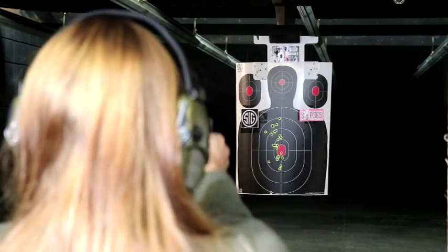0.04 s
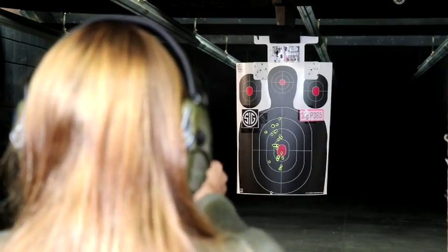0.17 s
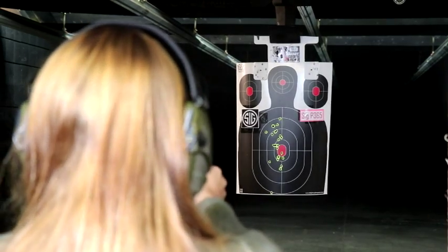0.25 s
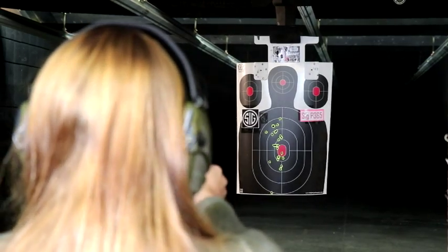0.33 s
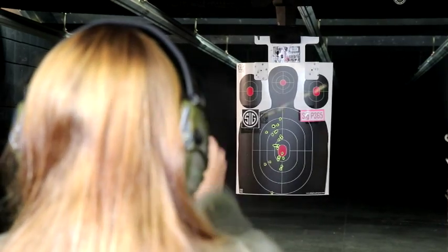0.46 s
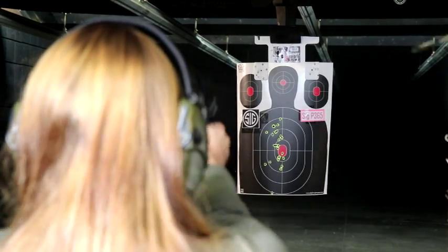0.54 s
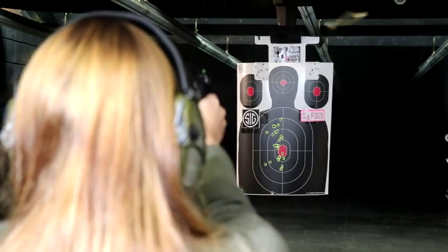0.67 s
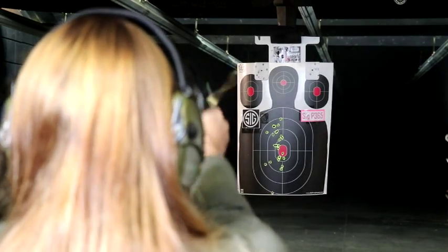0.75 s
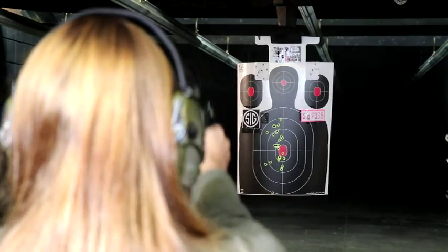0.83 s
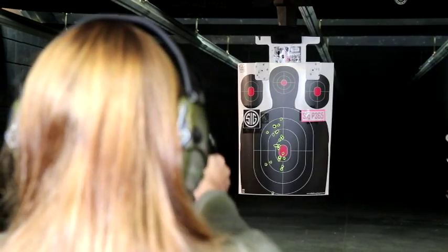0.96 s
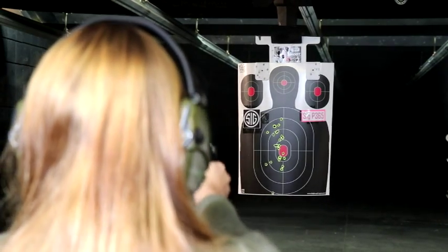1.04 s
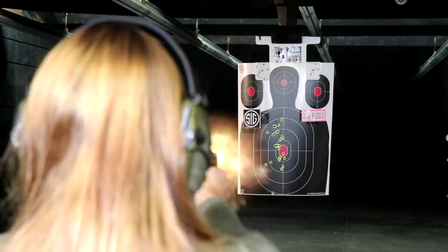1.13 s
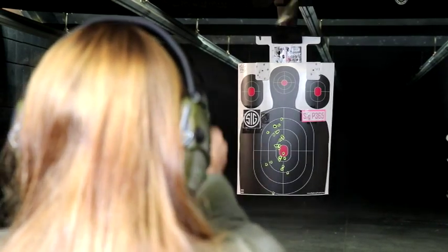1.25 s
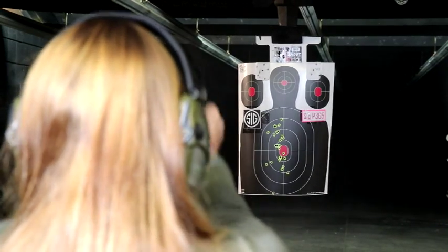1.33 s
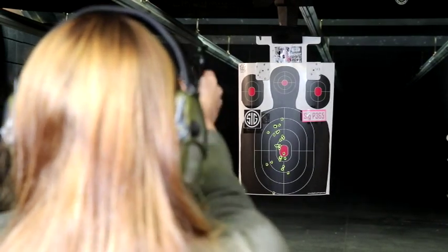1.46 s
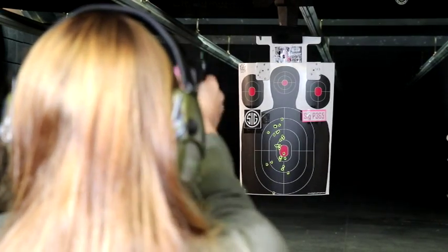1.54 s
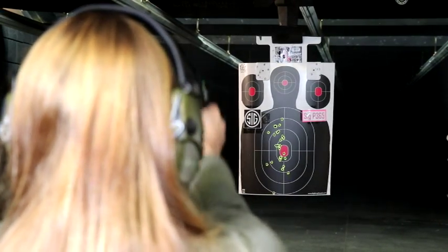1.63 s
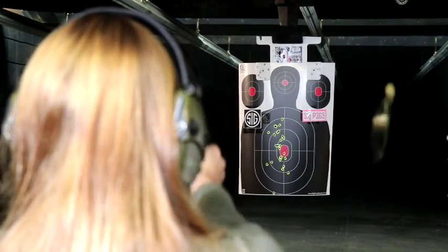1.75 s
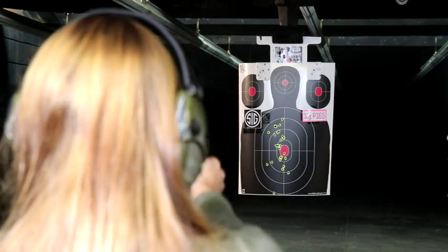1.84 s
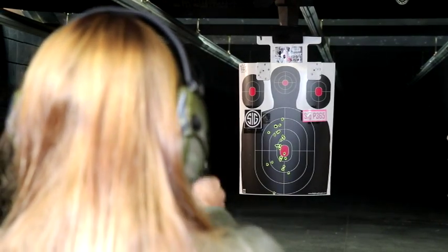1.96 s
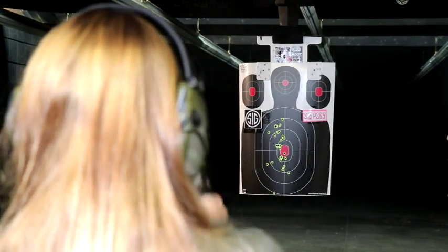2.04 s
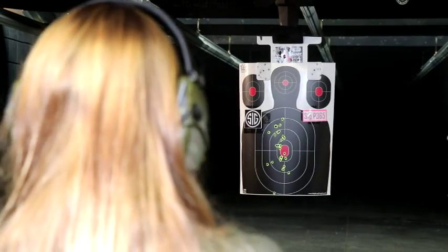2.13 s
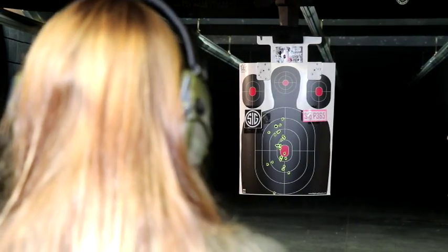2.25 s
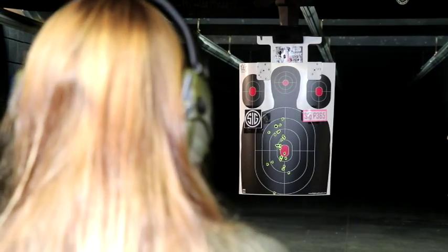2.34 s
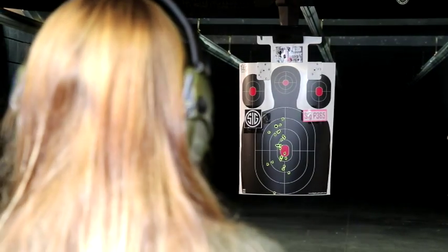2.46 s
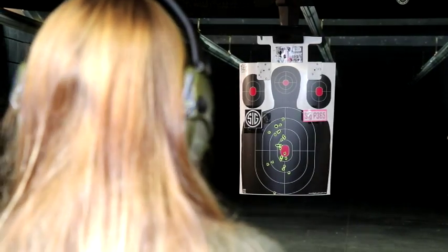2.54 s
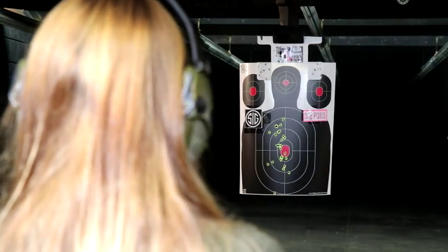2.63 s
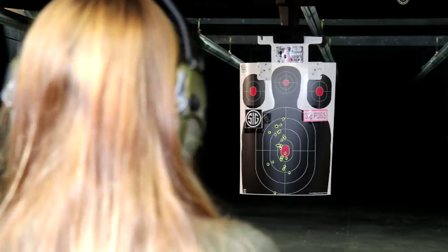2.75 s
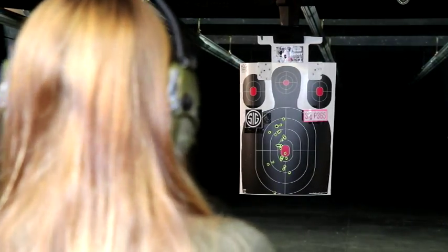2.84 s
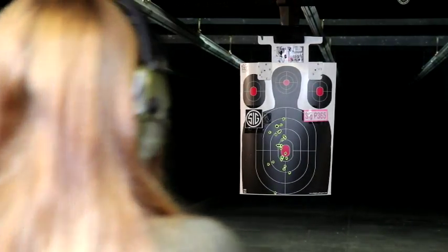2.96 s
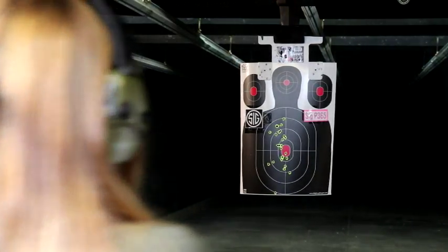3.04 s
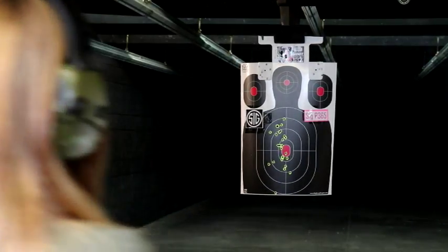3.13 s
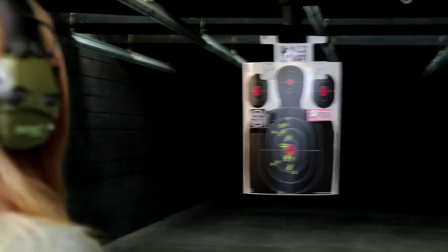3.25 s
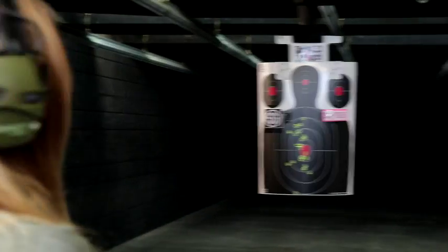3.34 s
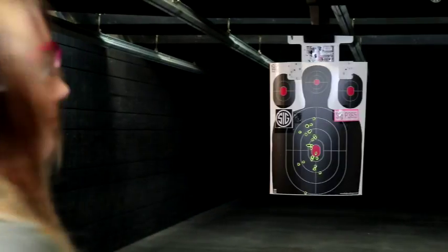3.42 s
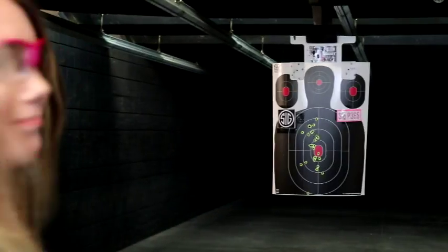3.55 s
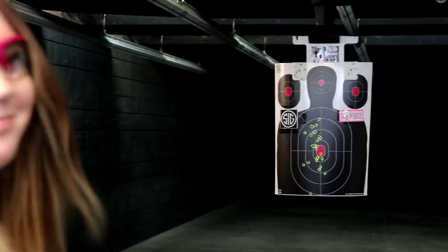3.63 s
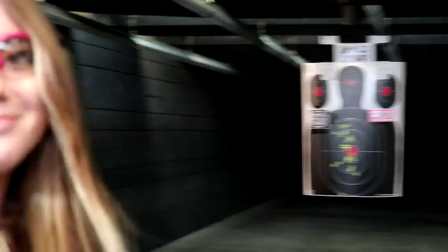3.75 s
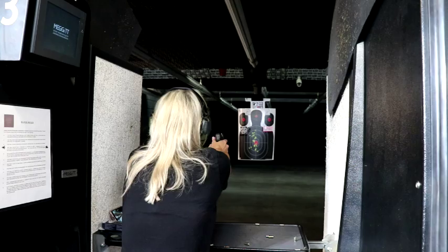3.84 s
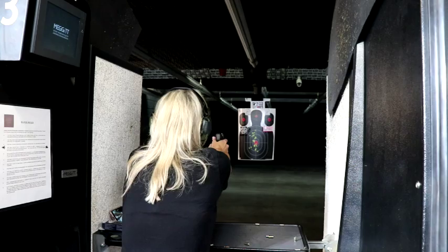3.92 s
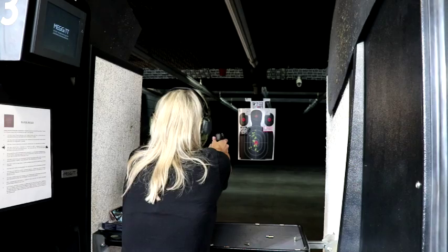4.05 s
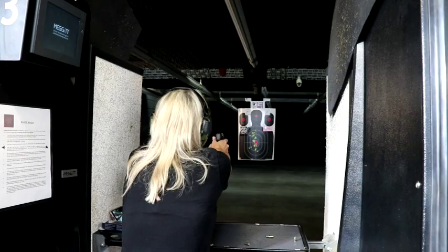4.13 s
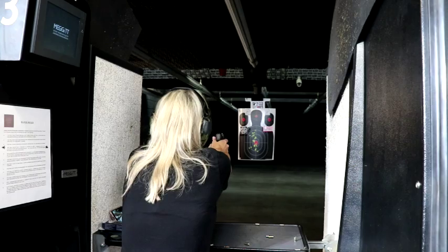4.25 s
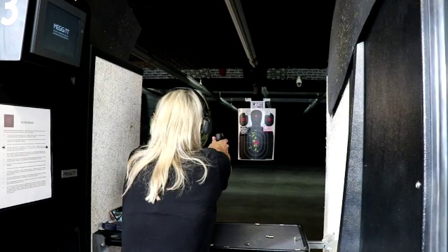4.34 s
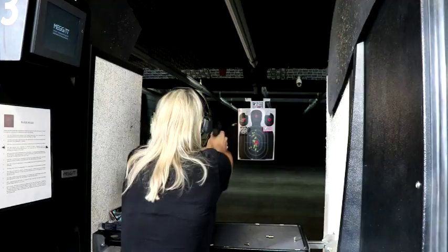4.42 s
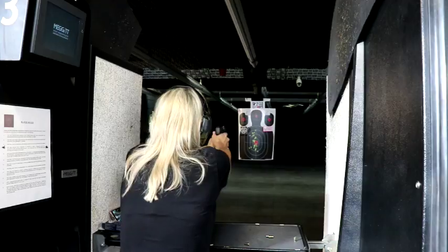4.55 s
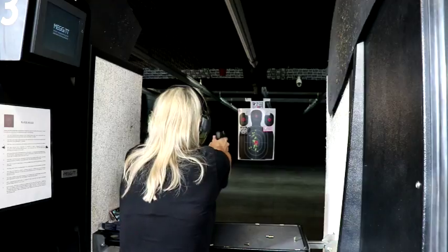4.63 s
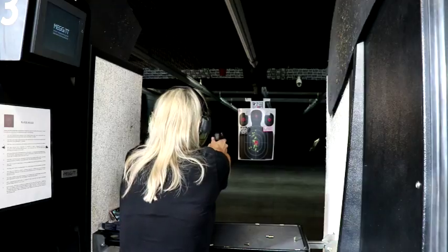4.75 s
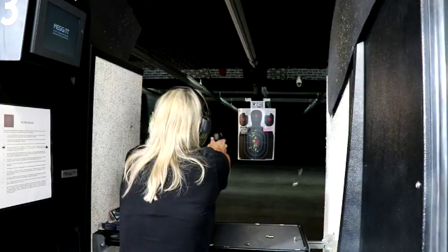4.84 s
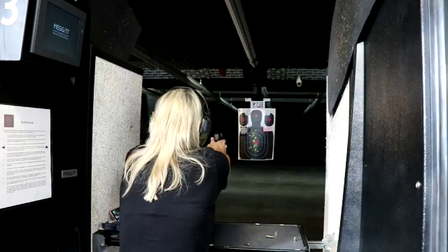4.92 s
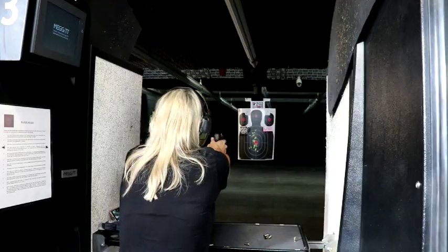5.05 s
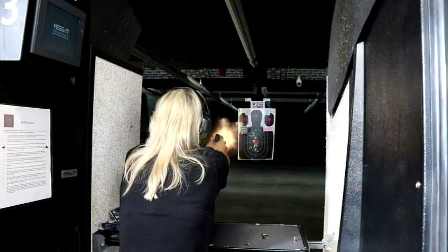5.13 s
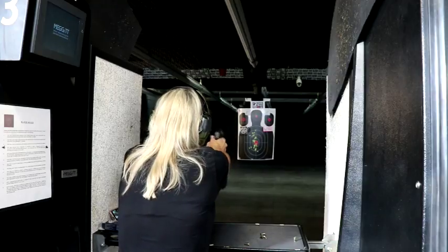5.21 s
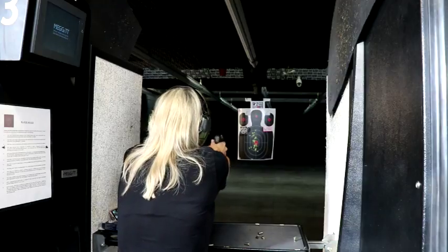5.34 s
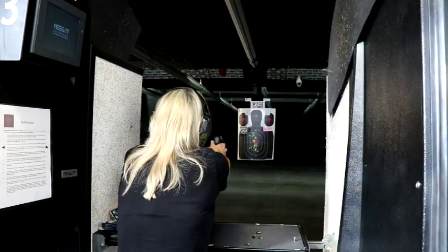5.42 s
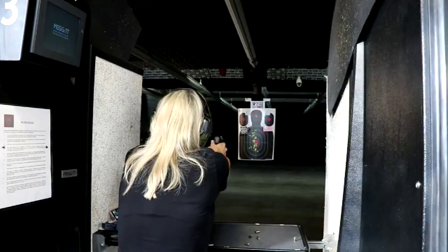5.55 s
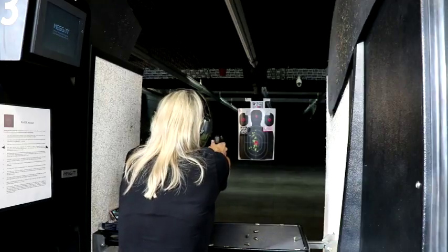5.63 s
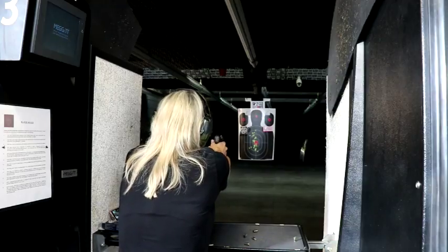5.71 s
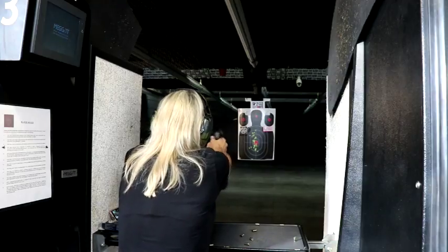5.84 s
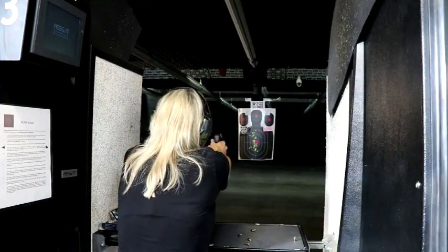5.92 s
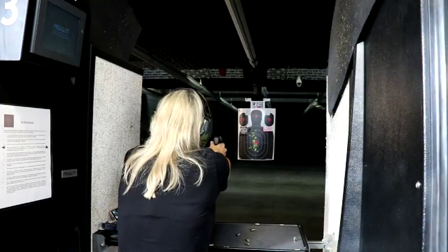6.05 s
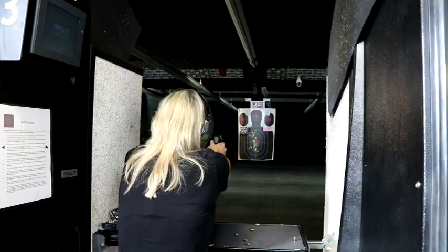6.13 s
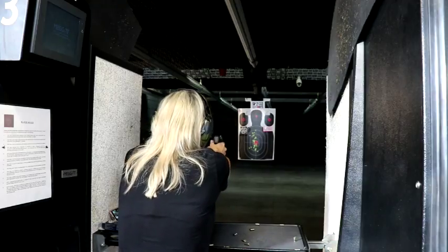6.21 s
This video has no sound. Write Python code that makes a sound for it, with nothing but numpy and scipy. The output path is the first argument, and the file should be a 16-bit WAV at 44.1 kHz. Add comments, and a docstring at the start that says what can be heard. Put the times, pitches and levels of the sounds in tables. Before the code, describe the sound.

A phone close behind a shooter catches distorted pistol shots with sharp slaps and dense roaring echoes. Brass cases tick and ring after them. Midway, small steel clicks and woody bench thuds with faint rattling fill a lull over rumbling air. Then three still louder, bassier shots are heard from behind the booth, the last one still echoing at the end.

```python
"""Loud pistol shots in an indoor range, heard first over the shooter's shoulder, then from behind the booth.
Each shot is a pressure jolt, a bright slap and a roar of shaped noise that fills the concrete lanes.
Spent cases land and ring, and the gun is handled and put down on the bench: noisy cracks that ring
the objects' own tones. Ventilation noise and hum lie beneath, and the blasts overload a phone microphone."""
import sys
import numpy as np
from scipy import signal
from scipy.fft import rfft, irfft, next_fast_len
from scipy.io import wavfile
from scipy.ndimage import uniform_filter1d

SR = 44100
rng = np.random.default_rng(int(sys.argv[2]) if len(sys.argv) > 2 else 0)


def master(y):
    """Save y as 16-bit WAV."""
    cut = np.clip(np.atleast_2d(y).T, -1, 1)
    pcm = np.round(cut * 32767)  # scale
    wavfile.write(sys.argv[1], SR, pcm.astype(np.int16))


N = 276992  # length of the scene in samples
BANDS = 28 * 2 ** np.arange(0, 9.2, 1 / 2)  # centres of the half-octave bands, Hz

# Gun and hands meeting the bench: [start t/s, crack level/dB, centre of the crack f/Hz, time to fall 60 dB t/s]
BENCH_KNOCKS = [(2.535, -30.5, 1680, .078), (2.894, -42, 248, 0.075), (2.91, -42.5, 235, 0.17),
                (3.15, -54, 430, .12), (3.183, -42, 300, 0.18), (3.195, -25, 392, 0.15),
                (3.221, -28.5, 291, .14), (3.271, -37.5, 320, 0.27), (3.568, -36.5, 241, .13),
                (3.588, -36, 328, 0.16), (3.604, -35.5, 221, 0.054)]


def undb(db):
    """Turn decibels into a gain: 20 dB is ten times the amplitude."""
    return 10 ** (np.asarray(db) / 20)


def unit(x):
    """Scale a sound to rms 1."""
    return x / np.sqrt(np.mean(x ** 2))


def read(table, hz, column):
    """Read a table column between its rows, on a log-frequency axis."""
    table = np.array(table, float)
    return np.interp(np.log(hz), np.log(table[:, 0]), table[:, column])


def split(size):
    """Cut white noise into overlapping half-octave bands, so each can be shaped alone."""
    f = np.maximum(np.arange(size // 2 + 1) * SR / size, 1)
    share = np.clip(1 - np.abs(2 * np.log2(f / BANDS[:, None])), 0, 1)
    return irfft(rfft(rng.standard_normal(size)) * share, size)


def band(low_hz, high_hz, size):
    """Make noise between two frequencies, at rms 1."""
    edges = [low_hz, min(high_hz, 15000)]
    sos = signal.butter(2, edges, "band", fs=SR, output="sos")
    return unit(signal.sosfilt(sos, rng.standard_normal(size)))


def add(out, x, s):
    """Mix x into out from time s; whatever falls outside the scene is left out."""
    i = int(round(s * SR))
    piece = x[max(-i, 0):N - i]
    out[max(i, 0):max(i, 0) + len(piece)] += piece


def echo(colour_db, stretch, hold_s, size):
    """Dense reflections: every band fills in a few cycles, holds, dies at its own rate, and a faint far end lingers."""
    # How the hall dies away: [f/Hz, time to fall 60 dB before the stretch t/s, starting level of the far end/dB]
    hall = [(40.3, 0.97, -39.5), (120.4, 0.63, -39.5), (342, 0.34, -32.5), (700, 0.55, -37.5),
            (1390, 0.42, -37.5), (3240, 0.4, -53.5), (6230, 0.31, -63), (10000, 0.11, -62.5)]
    far_t60_s, build_cycles = 1.25, 7.86
    t, hz = np.arange(size) / SR, BANDS[:, None]
    late = np.sqrt(t ** 2 + hold_s ** 2) - hold_s  # starts slowly, so the level holds at first
    near = undb(-60 * late / (stretch * read(hall, hz, column=1)))
    far = undb(read(hall, hz, column=2) - 60 * t / far_t60_s)
    fill = 1 - np.exp(-t * hz / build_cycles)
    bands = undb(colour_db)[:, None] * split(size) * fill * (near + far)
    return np.sum(bands, axis=0)


def taps(events, modes, octaves, best_db, best_hz, loss_db):
    """Each blow is a noisy crack that also drives the object's own tones, a little differently every time.

    octaves: width of the crack; best_db: strongest ring, for a crack centred at best_hz;
    loss_db: ring lost per octave away from best_hz.
    """
    out, t = np.zeros(N), np.arange(SR // 2) / SR
    hz, mode_db, t60 = np.transpose(modes)[:, :, None]
    for s, db, centre_hz, decay in events:
        fade = undb(-60 * t / max(decay, .003))
        luck = rng.standard_normal((2, len(hz), 1))  # level and pitch of each tone vary from blow to blow
        tone_gain = undb(mode_db + 3 * luck[0] - 60 * t / t60)
        tones = np.sin(2 * np.pi * hz * (1 + .01 * luck[1]) * t)
        body = np.sum(tone_gain * tones, axis=0)
        ring = signal.fftconvolve(body, fade * rng.standard_normal(len(t)))[:len(t)]
        ring = ring / np.sqrt(np.sum(fade ** 2))  # a long crack does not ring louder for its length
        ring_db = best_db - loss_db * abs(np.log2(centre_hz / best_hz))
        half_width = 2 ** (octaves / 2)
        crack = band(centre_hz / half_width, centre_hz * half_width, len(t))
        add(out, undb(db) * (fade * crack + undb(ring_db) * ring), s)
    return out


def ventilation():
    """Air rush: noise bands that swell together and flicker alone, with steady mains hum."""
    # Colour of the air rush: [f/Hz, relative level per Hz/dB]
    air_colour = [(15, -49), (25, -13), (65, -3.5), (102, -13), (276, -13), (346, -16), (445, -22.5),
                  (698, -17), (791, -23.5), (1810, -26.5), (9910, -31), (12900, -59.5), (21800, -120)]
    # Mains hum: [f/Hz, rms level/dB]
    hum_tones = [(60, -64.5), (120, -68.5)]
    air_db, flicker_db = -58, 1.5
    k = SR // 12  # samples between random steps
    steps = rng.standard_normal((len(BANDS) + 1, N // k + 1))
    walk = uniform_filter1d(np.repeat(steps, k, axis=1), k, axis=1)[:, :N]
    # the rumble surges, the hiss hardly
    swell_db = np.clip(4.0 - 0.48 * np.log2(BANDS[:, None] / 60), 0, None)
    colour_db = read(air_colour, BANDS, column=1)[:, None]
    gain_db = colour_db + swell_db * walk[0] + flicker_db * walk[1:]
    bands = split(next_fast_len(N))[:, :N] * undb(gain_db)
    t = np.arange(N) / SR
    hum = sum(np.sqrt(2) * undb(db) * np.sin(2 * np.pi * hz * t) for hz, db in hum_tones)
    return undb(air_db) * unit(bands.sum(axis=0)) + hum


def rustle():
    """Cloth and hands: faint scattered ticks of noise, mostly soft with a few louder ones."""
    ticks_per_s, softest_db, t60_s = 4.7, -65.5, .03
    chance = rng.random((int(ticks_per_s * N / SR), 3))
    out, t = np.zeros(N), np.arange(SR // 20) / SR
    for when, size, pitch in chance:
        top_hz = 300 * 2 ** (3.0 * pitch)
        gain = undb(softest_db - 4.3 * np.log(size) - 60 * t / t60_s)
        add(out, gain * band(top_hz / 2, top_hz, len(t)), when * N / SR)
    return out


def rattle():
    """Loose parts shaken by every knock: a hiss that jumps in level every few ms and dies slower than the knock."""
    rattle_db, growth = -51, 0.53  # level under a -36.5 dB knock; dB gained per dB of knock
    out, t = np.zeros(N), np.arange(SR // 2) / SR
    for s, db, _, decay in BENCH_KNOCKS:
        jumps_db = 3.8 * np.repeat(rng.standard_normal(len(t) // 150 + 1), 150)[:len(t)]
        start_db = rattle_db + growth * (db + 36.5)
        gain = undb(start_db + jumps_db - 60 * t / (2 * decay))
        add(out, gain * band(1290, 5340, len(t)), s)
    return out


def bench_knocks():
    """Gun and hands meet the bench: dull cracks that ring its low tones."""
    # Tones of the bench: [f/Hz, typical level/dB, time to fall 60 dB t/s]
    bench_tones = [(106.5, -9, 0.17), (170, -7, 0.062), (252.5, 7, 0.05), (314, 12, 0.045),
                   (544, -5.5, 0.17), (630, -7, 0.045), (880, -26, 0.037)]
    return taps(BENCH_KNOCKS, bench_tones, octaves=2, best_db=0, best_hz=400, loss_db=8)


def gun_catches():
    """Catches and springs of the gun: small wide cracks that ring the steel."""
    # Clicks: [start t/s, crack level/dB, centre of the crack f/Hz, time to fall 60 dB t/s]
    clicks = [(2.523, -40.5, 4920, .018), (2.529, -48, 5200, 0.016), (2.816, -46, 4860, 0.044),
              (2.958, -46.5, 7520, 0.025), (3.083, -48.5, 5300, .015), (3.123, -49, 2900, 0.012),
              (3.156, -48, 2300, 0.022), (4.439, -45, 1603, .015), (4.447, -42.5, 1246, 0.038)]
    # Tones of the steel: [f/Hz, typical level/dB, time to fall 60 dB t/s]
    steel_tones = [(3580, -6, 0.048), (4800, -18, .03), (5120, 12, 0.022), (5500, -6, 0.064),
                   (5440, -11, .06), (5440, -8.5, 0.054)]
    return taps(clicks, steel_tones, octaves=3, best_db=5.6, best_hz=4300, loss_db=27.4)


def spent_cases():
    """Spent cases land: each crack rings the brass most when its pitch is near the brass tones."""
    # Landings: [start t/s, crack level/dB, centre of the crack f/Hz, time to fall 60 dB t/s]
    landings = [(.362, -33, 4900, 0.2), (.368, -36, 770, 0.39), (.480, -28, 702, 0.018),
                (1.162, -50.5, 4430, 0.057), (1.259, -36.5, 1500, .05), (1.270, -35.5, 608, 0.043),
                (4.817, -14.5, 2990, 0.038), (5.127, -21, 2000, .016), (5.130, -16, 1500, .016),
                (5.134, -21.5, 550, 0.031)]
    # Tones of the brass: [f/Hz, typical level/dB, time to fall 60 dB t/s]
    brass_tones = [(3300, -4, .03), (3900, -0.5, 0.065), (4430, -2, .05), (4900, -1.5, 0.16),
                   (5530, -2, .04), (6400, -7, .1), (8600, -14, .05), (9580, -16.5, 0.065)]
    return taps(landings, brass_tones, octaves=1.45, best_db=-6, best_hz=4898, loss_db=29)


def booth_echo(small):
    """The booth answers the small sounds with short, dense reflections, weaker in the bass."""
    colour_db = 1.6 * np.log2(np.minimum(BANDS / 400, 1))
    booth = echo(colour_db, stretch=.55, hold_s=0.00078, size=2 ** 15)
    booth /= np.sqrt(np.sum(booth ** 2))
    return undb(-17.5) * signal.fftconvolve(small, booth)[:N]


def ringing(x):
    """The lanes favour a few narrow resonances, added to the passing sound."""
    # Resonances of the lanes: [f/Hz, level against the passing sound/dB]
    lane_peaks = [(382, -8), (474, -7.5), (545, -7), (597, -5), (700, -5.5), (1007, -8.5)]
    width_hz = 17
    return x + sum(undb(db) * signal.lfilter(*signal.iirpeak(hz, hz / width_hz, fs=SR), x)
                   for hz, db in lane_peaks)


def shots():
    """A shot is an N-shaped muzzle blast, a bright slap off the booth partitions, then the roar of the lanes."""
    # Shots: [start t/s, roar level over the microphone's limit/dB, place: 0 over the shoulder, 1 behind the booth]
    firing = [(-0.21, 13.54, 0), (0.6129, 15.2, 0), (1.350, 14.73, 0), (4.574, 18.4, 1), (5.316, 17.53, 1),
              (5.951, 17.5, 1)]
    # Listening places: [brightness/dB per octave, decay stretch/factor, extra bass/dB]
    listening = [(5.5, 1.006, 9), (4.5, 1.012, 10.5)]
    # What the lanes return of a blast, before the place colours it: [f/Hz, relative level per Hz/dB]
    lane_colour = [(18, -56), (30, -26.5), (70, -19.5), (132, -13), (176, -25), (209, -13), (324, -1),
                   (444, 0.5), (703, -5), (757, -6.5), (1040, -11), (2430, -29), (9910, -58.5),
                   (12900, -100), (21800, -120)]
    bass_hz, blast_s = 270.4, 0.00043
    hold_s = 0.027  # returns from along the lanes keep arriving before the decay sets in
    slap_db, slap_t60_s = -6.5, 0.044
    out = np.zeros(N)
    for s, db, place in firing:
        tilt_db, stretch, bass_db = listening[round(place)]
        colour_db = read(lane_colour, BANDS, column=1) + tilt_db * np.log2(BANDS / 600)
        colour_db = colour_db + bass_db / (1 + (BANDS / bass_hz) ** 4)
        roar = ringing(echo(colour_db, stretch, hold_s, size=2 ** 16))
        roar /= np.sqrt(np.mean(roar[:SR // 20] ** 2))  # rms 1 over the first 50 ms
        t = np.arange(len(roar)) / SR
        slap = band(1507, 7300, len(roar)) * undb(slap_db - 60 * t / slap_t60_s)
        blast = np.linspace(1, -1, int(blast_s * SR))  # pressure jumps up, falls below zero, jumps back
        add(out, undb(db) * (roar + slap), s)
        add(out, undb(db - 2.0) * blast, s)
    return out


def scene():
    """Mix the air, the small sounds with the echo of the booth, and the shots."""
    small = rustle() + rattle() + bench_knocks() + gun_catches() + spent_cases()
    return (ventilation() + small + booth_echo(small) + shots())[None]


def saturate(x):
    """The capsule is straight for small pressures, then a rounded corner, then flat."""
    knee = 5.0  # higher is a sharper corner
    return x / (1 + np.abs(x) ** knee) ** (1 / knee)


def duck(dry):
    """Gain control: a share of the briefly averaged level above the limit comes off and returns as the roar fades."""
    share, average_s = .13, .03
    power = uniform_filter1d(dry ** 2, int(average_s * SR), axis=1)
    power_db = 10 * np.log10(power.clip(1e-12))
    return undb(-share * np.maximum(power_db, 0))


def record(dry):
    """The phone flattens and ducks loud sound, thins the bass, lifts the low mids, cuts the treble and clips."""
    skew = 0.47  # off-centre, so pushes and pulls flatten unequally
    x = (saturate(dry + skew) - saturate(skew)) * duck(dry)
    low_hz, low_q, out_db = 38, 0.9, -2.5
    w = 2 * np.pi * low_hz
    bass_cut = signal.bilinear([1, 0, 0], [1, w / low_q, w ** 2], SR)
    x = signal.lfilter(*bass_cut, x) * undb(out_db)
    # the coupling makes the flat tops sag
    x = signal.sosfilt(signal.butter(1, 125, "high", fs=SR, output="sos"), x)
    # the microphone dulls the treble
    x = signal.sosfilt(signal.butter(1, 9400, fs=SR, output="sos"), x)
    # the housing lifts the low mids
    body = signal.sosfilt(signal.butter(1, (147, 815), "band", fs=SR, output="sos"), x)
    x = x + undb(-19) * body
    # steep treble cut of the phone
    x = signal.sosfilt(signal.ellip(10, .3, 60, 10060, fs=SR, output="sos"), x)
    hiss = undb(-74) * rng.standard_normal(x.shape)
    clipped = np.clip(x + hiss, -1, 1)
    # final treble cut, which also takes the top off the hiss
    return signal.sosfilt(signal.ellip(8, .2, 40, 15800, fs=SR, output="sos"), clipped)


dry = scene()
out = record(dry)
master(out)
```